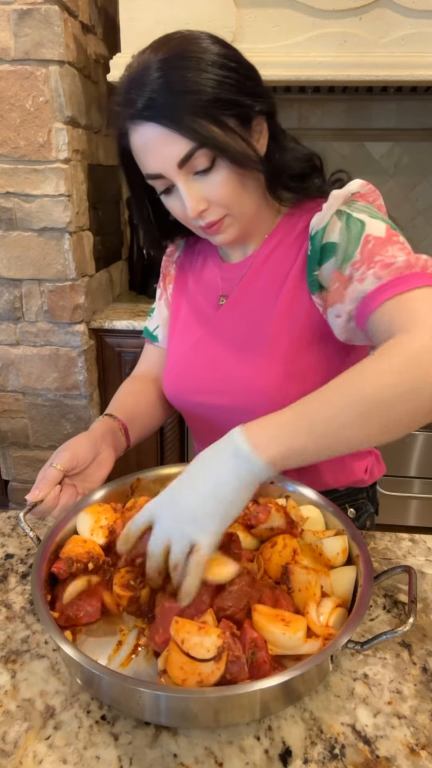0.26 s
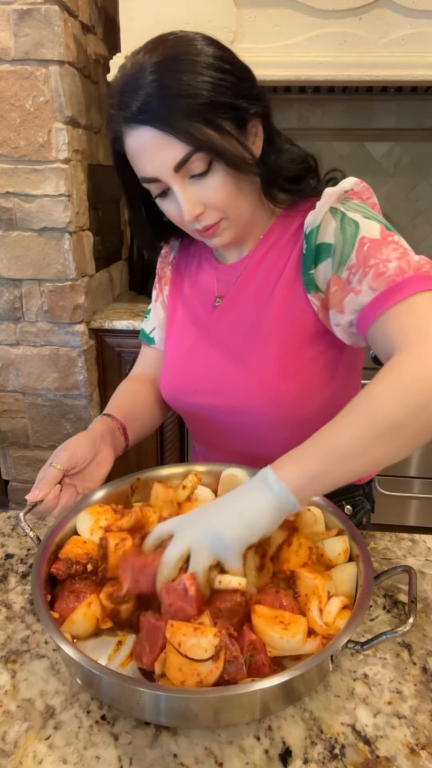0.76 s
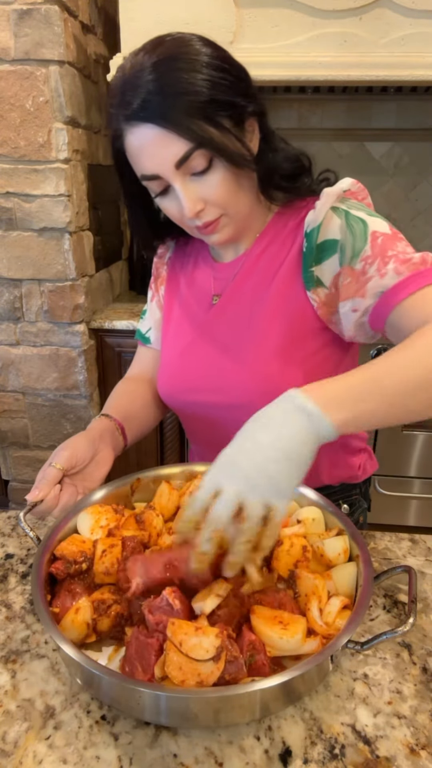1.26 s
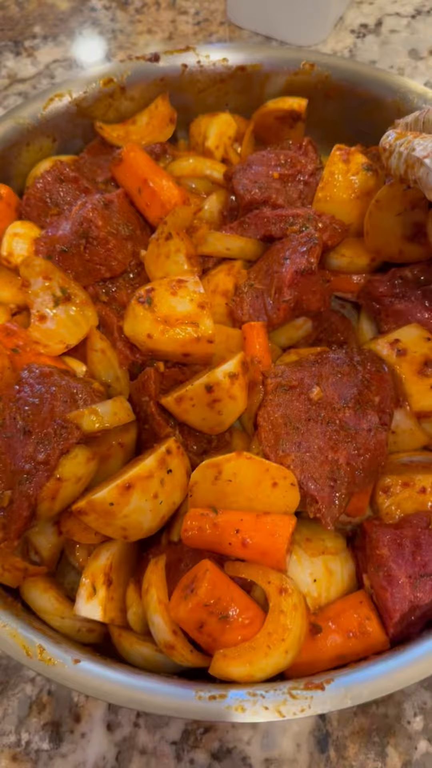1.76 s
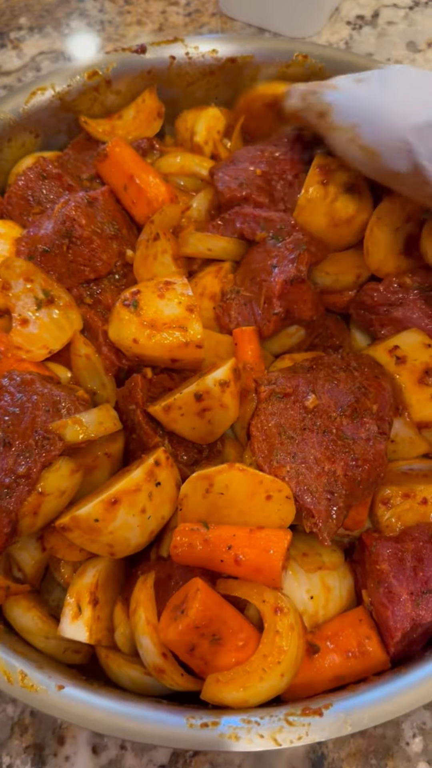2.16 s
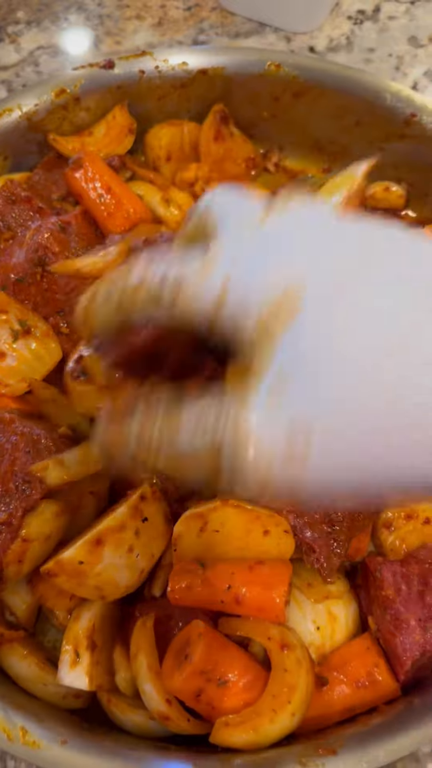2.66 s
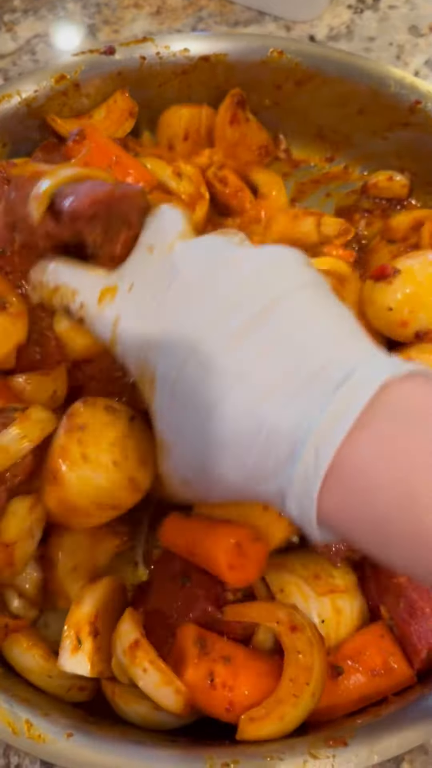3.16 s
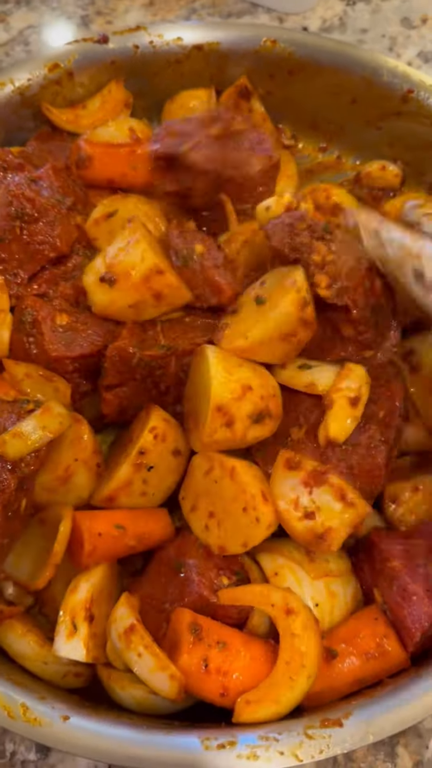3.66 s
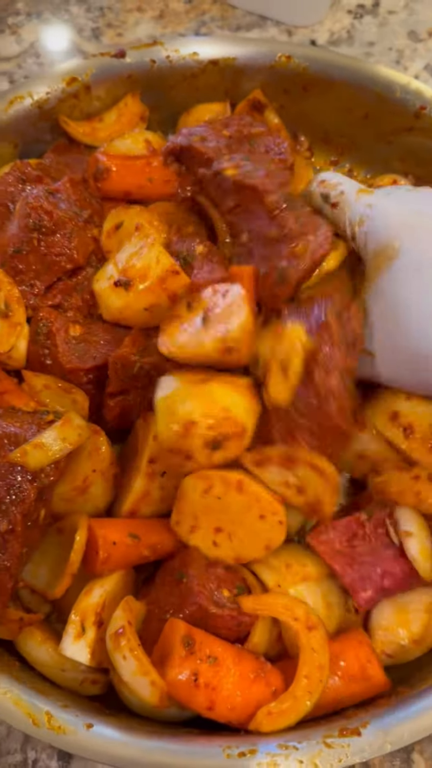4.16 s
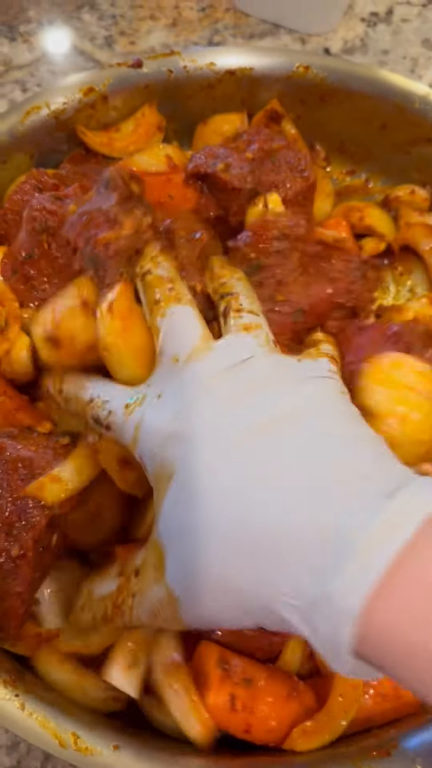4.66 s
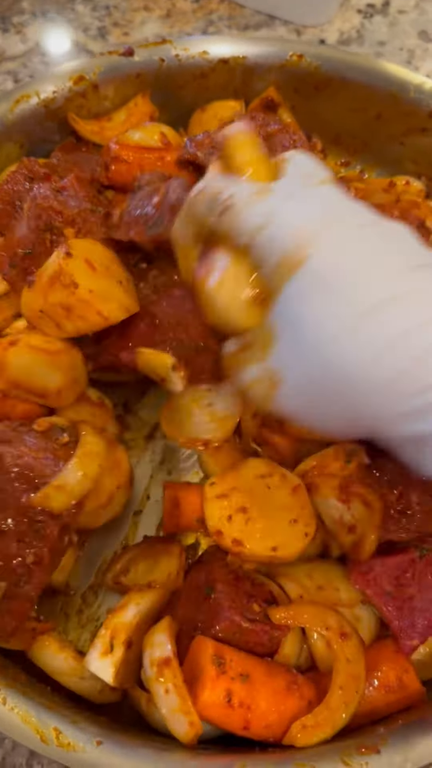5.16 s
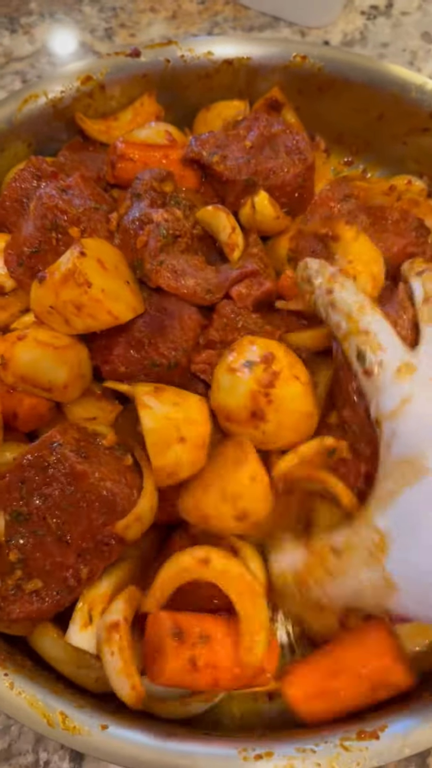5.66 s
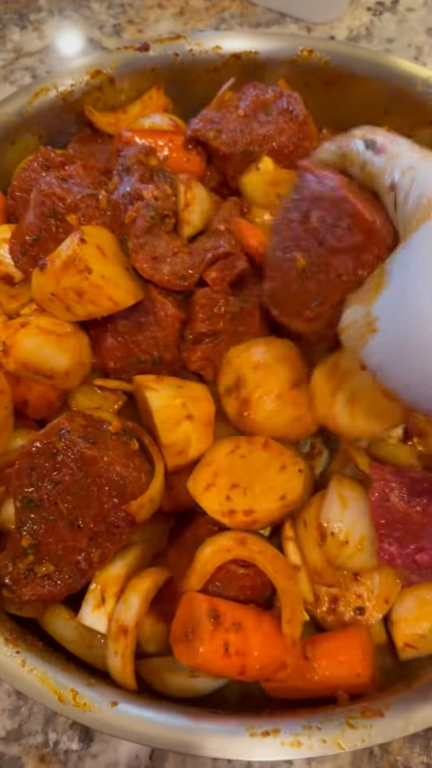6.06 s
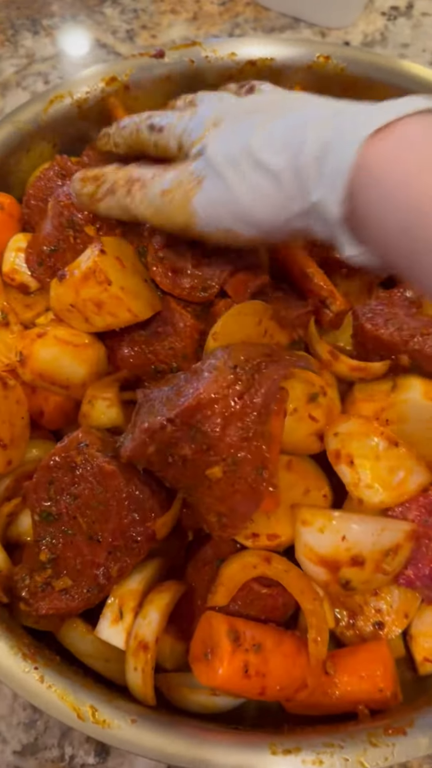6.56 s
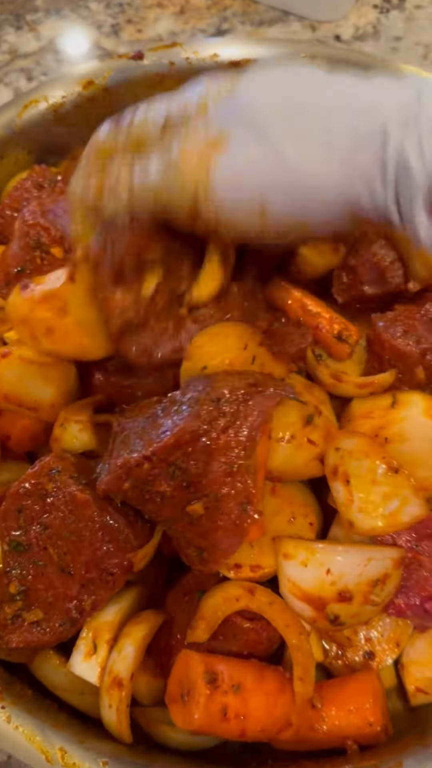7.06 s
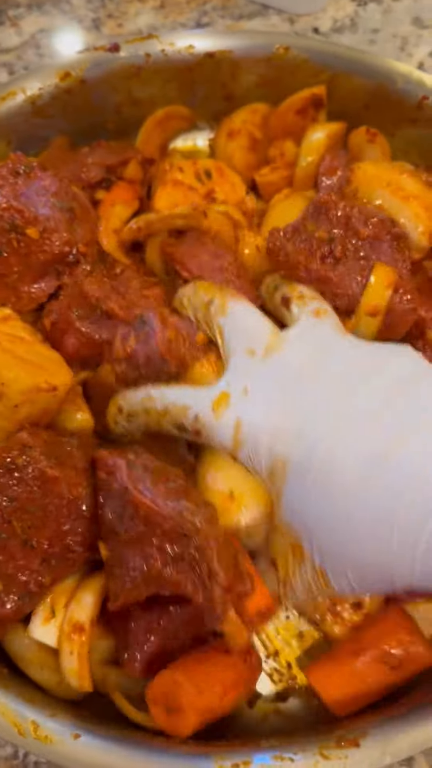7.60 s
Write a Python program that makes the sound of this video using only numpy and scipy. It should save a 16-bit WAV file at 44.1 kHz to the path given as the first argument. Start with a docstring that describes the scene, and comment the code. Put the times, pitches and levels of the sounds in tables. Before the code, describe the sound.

A quiet kitchen with low, soft room air and a faint wavering appliance hum. From 0 to 1.8 s, the microphone is across the counter, in mono and a little roomy: soft squelches around 0.6 to 0.9 s, small pops, dull plops of food, and a wet click at 1.5 s. Then the sound dips briefly and becomes close stereo above the steel pot, brighter and more detailed. Squishes and sticky crackles come at 2.1 and 3.0 to 3.3 s, with plops near 2.7. At 4.0 s comes the strongest wet pop and hollow plop. Dense sticky tearing follows from 4.6 to 5.1 s, then another squelch at 5.5 to 5.9. After a lull, several chunks plop together around 6.7 s with muted pot resonance. From 7.3 s to the end, plops and quick juicy squelches with crisp film ticks continue.

```python
"""A gloved hand turns raw meat and vegetable chunks in oily sauce in a steel pot, in a quiet kitchen.
Clumps of tiny ringing grains and noise make the squelching sauce and the tearing of sticky films.
Air pockets pop as brief rising rings; chunks plop as sinking notes with a slap and the pot's resonances.
The microphone is first across the counter, in mono, then right above the pot, in stereo.
Still room air is coloured noise, and an appliance hums in wavering tones."""
import sys
import numpy as np
from scipy import signal
from scipy.fft import rfft, irfft, next_fast_len
from scipy.io import wavfile
from scipy.ndimage import uniform_filter1d, map_coordinates

SR = 44100
rng = np.random.default_rng(int(sys.argv[2]) if len(sys.argv) > 2 else 0)


def dump(signal):
    """Clip the signal to [-1, 1] and save it as 16-bit WAV at the path in sys.argv[1]."""
    limited = np.clip(np.atleast_2d(signal).T, -1, 1)
    pcm = np.round(limited * 32767).astype(np.int16)
    wavfile.write(sys.argv[1], SR, pcm)


N = 345302

CLOSE_S = 1.787  # from here on the microphone is right above the pot
# chunks landing on the heap and the pot floor: start_s, level_db (nominal), pitch_hz (before its glide),
# floor_db (pot against level, halved in use), slap_db (against level, capped at 6)
PLOPS = [(0.315, -43, 503, -22, 1.5), (0.55, -40.5, 213, -15, -10), (0.625, -34, 195, -23, -6),
         (0.74, -38.5, 119, -11, -7), (1.045, -44.5, 124, -9, -12), (1.504, -40, 556, -11, 6),
         (1.599, -41.5, 148, 0, 1.5), (2.184, -41.5, 262, -2, -20), (2.725, -39.5, 598, -18, -1.5),
         (2.733, -33.5, 275, -29, -24), (2.76, -39.5, 263, -21, -27), (2.96, -40, 396, -2, 1),
         (3.28, -40.5, 260, -19, -12), (3.562, -43, 270, -12, -28), (3.987, -25.5, 406, -18, -9),
         (4.003, -36.5, 149, -10, -12), (4.773, -43.5, 128, -16, -15), (5.637, -35.5, 547, -7, -3),
         (5.659, -37.5, 135, -6, -19), (5.736, -41, 167, -8, 0), (6.593, -44, 510, -6, -15),
         (6.675, -38.5, 439, -2, -8), (6.694, -27, 516, -7, -5), (6.709, -26.5, 450, -16, -10),
         (6.72, -32, 260, -22, -32), (6.737, -34.5, 135, -1, -33), (6.804, -38, 116, 2, -26),
         (7.336, -34.5, 547, -33, -16), (7.346, -32, 440, -24, -20), (7.455, -36.5, 120, -4, -8)]


def amp(db):
    """Decibels to gain."""
    return 10 ** (np.asarray(db) / 20)


def unit(x):
    """Scaled to rms 1."""
    return x / np.sqrt(np.mean(x ** 2) + 1e-20)


def along(points, hz):
    """Points of (frequency, value) read on a log frequency axis."""
    f, v = np.transpose(points)
    return np.interp(np.log(hz + 1), np.log(f + 1), v)


def wobble(rate):
    """A smooth random curve, rate knots a second."""
    coarse = np.arange(0, N + 32, 32)
    knots = rng.standard_normal(int(N * rate / SR) + 4)
    return np.interp(np.arange(N), coarse, map_coordinates(knots, [coarse * rate / SR]))


def filtered(x, response):
    """x times a complex response of frequency."""
    m = next_fast_len(N + SR // 2)
    spectrum = rfft(x, m) * response(np.fft.rfftfreq(m, 1 / SR))
    return irfft(spectrum, m)[..., :N]


def coloured(x, spectrum):
    """x given a spectrum in dB, at rms 1."""
    return unit(filtered(x, lambda hz: amp(along(spectrum, hz))))


def add(track, s, sound):
    """Mix a sound into a track at time s."""
    start = max(0, round(s * SR))
    part = sound[:max(0, N - start)]
    track[start:start + len(part)] += part


def steady(x, span):
    """x with its level evened out over span seconds."""
    power = np.abs(uniform_filter1d(x ** 2, int(span * SR)))
    return x / np.sqrt(power + 1e-4)


def grains(rate, low_hz, high_hz, cycles, spread_db, size):
    """Tiny cavities, rate a second, each ringing for a few cycles at its own pitch and strength."""
    when, pitch, strength, life = rng.random((int(rate * N / SR), 4)).T[:, :, None]
    turns = low_hz * (high_hz / low_hz) ** pitch * np.arange(size) / SR
    # most grains are faint, a few stand out
    gain = amp(spread_db * np.minimum(-np.log(1 - strength), 4))
    rings = gain * np.sin(2 * np.pi * turns) * np.exp(-turns / (cycles * (.5 + life)))
    at = (when * N).astype(int) + np.arange(size)
    out = np.bincount(at.ravel(), rings.ravel(), N + size)[:N]
    # small cavities are brief and hold little energy: lifting them evens the spectrum
    return unit(filtered(out, lambda hz: np.clip(hz, low_hz, high_hz)))


def shifting(x, depth_db):
    """Gaps between the pieces open and close, so resonances come and go."""
    z = signal.stft(x, nperseg=512)[2]
    field = rng.standard_normal(z.shape)
    field = uniform_filter1d(field, size=5, axis=0)  # smooth over frequency
    field = uniform_filter1d(field, size=7, axis=1)  # smooth over time
    return signal.istft(z * amp(depth_db * unit(field)), nperseg=512)[1][:N]


def burst(t, rise, decay, low_hz, high_hz):
    """A band of noise that swells quickly and dies away, peak 1; rise and decay in seconds."""
    band = signal.butter(2, [low_hz, min(high_hz, .45 * SR)], "band", fs=SR, output="sos")
    envelope = (1 - np.exp(-t / rise)) * np.exp(-t / decay)
    x = signal.sosfilt(band, rng.choice([-1, 1], len(t)) * envelope)
    return x / np.abs(x).max()


def swells(events, rise, decay, rest_db):
    """Level in dB of (start, hold, dB) events that build up, hold and die away over a resting level."""
    t = np.arange(0, N + 64, 64) / SR
    start, hold, db = np.transpose(events)[:, :, None]
    before = np.maximum(start - t, 0)
    after = np.maximum(t - start - hold, 0)
    shape = np.exp(-before / rise - after / decay)
    power = np.sum((amp(db) * shape) ** 2, axis=0) + amp(rest_db) ** 2
    return np.interp(np.arange(N) / SR, t, 10 * np.log10(power))


def hand():
    """Nominal squelch and film crackle levels in dB as the hand pushes and lets go."""
    # pushes of the hand through the food: start_s, hold_s, squelch_db, film_db
    strokes = [(0.0, .14, -58.5, -61.5), (0.18, 0.2, -64.5, -65.5), (0.556, 0.08, -53, -62.5),
               (0.712, 0.042, -50, -55.5), (0.787, 0.17, -53, -59), (0.987, 0.37, -63, -67),
               (1.512, 0.12, -55.5, -61.5), (1.674, 0.093, -58, -64), (2.063, 0.014, -46.5, -60),
               (2.128, 0.051, -54.5, -55.5), (2.234, 0.25, -61.5, -67.5), (2.8, 0.2, -65, -67.5),
               (2.996, 0.054, -51.5, -55.5), (3.11, 0.21, -56, -59.5), (3.337, .12, -68.5, -61.5),
               (3.743, 0.22, -62.5, -62.5), (3.972, 0.13, -51, -55.5), (4.164, 0.082, -63, -65),
               (4.612, .01, -60.5, -60.5), (4.685, 0.041, -58, -52), (4.842, 0.09, -53, -50),
               (4.971, 0.023, -49, -46), (5.121, 0.13, -68, -66.5), (5.513, 0.021, -53.5, -54),
               (5.615, 0.25, -53, -55), (5.964, 0.068, -66.5, -60), (6.199, 0.025, -67, -64),
               (6.577, 0.1, -64, -59), (6.76, 0.012, -54.5, -65), (6.847, 0.16, -59.5, -64),
               (7.08, 0.018, -64, -69.5), (7.373, 0.074, -52.5, -55.5), (7.526, 0.066, -56, -59),
               (7.651, 0.044, -48.5, -50), (7.766, 0.041, -51, -55.5)]
    press_s, let_go_s = 0.029, 0.03  # time constants of a push building up and dying away
    # the resting levels are the sauce creeping between pushes
    squelch = [(s, hold, db) for s, hold, db, _ in strokes]
    film = [(s, hold, db) for s, hold, _, db in strokes]
    squelch_db = swells(squelch, press_s, let_go_s, rest_db=-80)
    film_db = swells(film, press_s, let_go_s, rest_db=-71.5)
    return squelch_db, film_db


def sauce(close):
    """Sauce squelches between the pieces while sticky films tear off glove and meat."""
    # spectrum of the squelch: frequency_hz, level_db (relative)
    squelch_colour = [(400, -23), (700, -2), (1100, -.5), (1500, -2), (2100, -2), (3000, -8.5), (5000, -11),
                      (9000, -15)]
    # spectrum of the films from across the counter: frequency_hz, level_db (relative)
    film_far = [(1500, -2), (3300, -1), (5000, -4), (7000, 0), (10000, 3.5), (12500, -6), (16000, -6)]
    # spectrum of the films from right above the pot: frequency_hz, level_db (relative)
    film_near = [(1500, -5.5), (3300, -3), (5000, -1), (7000, 0.5), (9300, 2.5), (15500, -5)]

    squelch_db, film_db = hand()
    clumps = wobble(70)  # pieces stick and let go
    # a light touch gives single ticks; in a hard stroke they merge into a wet rustle
    merged = np.interp(np.maximum(squelch_db, film_db), [-62, -46], [.5, 1.5])
    bubbles = grains(rate=1000, low_hz=598, high_hz=4480, cycles=1.7, spread_db=3.5, size=300)
    ticks = grains(rate=900, low_hz=2650, high_hz=15300, cycles=1.55, spread_db=4.5, size=100)

    squelching = shifting(bubbles + merged * rng.standard_normal(N), depth_db=4.5) * amp(2.1 * clumps)
    squelch = coloured(squelching, squelch_colour)
    tearing = shifting(ticks + merged * rng.standard_normal(N), depth_db=2.5) * amp(2.66 * clumps)
    film = np.where(close, coloured(tearing, film_near), coloured(tearing, film_far))
    return amp(squelch_db - 1.77) * steady(squelch, span=.06) + amp(film_db + 2.0) * steady(film, span=0.074)


def heap():
    """Soft pieces tumble against each other with dull bumps, under the hand and after each landing."""
    # spectrum of the bumps: frequency_hz, level_db (relative)
    bump_colour = [(50, -9), (90, 2), (160, 2.5), (280, -4.5), (500, -7), (900, -17), (2000, -47)]
    bumps = grains(rate=130, low_hz=99.5, high_hz=804, cycles=1.11, spread_db=2, size=2400)
    # neighbours tumble 18.5 dB below a landing's level; the resting level is the heap's slow shifting
    landings = [(s, 0, db - 18.5) for s, db, *_ in PLOPS]
    tumble_db = swells(landings, rise=0.015, decay=0.068, rest_db=-64)
    push_db = hand()[0] - 11.5  # the heap's share of a push
    level = np.hypot(amp(tumble_db), amp(push_db))
    return level * steady(coloured(bumps, bump_colour), span=0.16)


def background():
    """Still room air as coloured noise and an appliance's wavering hum, as mid and side."""
    # spectrum of the room air: frequency_hz, level_db (relative)
    air_colour = [(25, -16), (45, 3.5), (100, 0), (200, -5), (500, -17.5), (900, -27.5), (1500, -29.5),
                  (2600, -30), (4500, -37), (6500, -31.5), (9000, -34.5), (11000, -49), (15500, -34)]
    # appliance tones: frequency_hz, level_db (nominal, wavers)
    hum_tones = [(43.3, -61.5), (59.5, -73.5), (115, -64)]
    t = np.arange(N) / SR
    hum = np.zeros(N)
    for hz, db in hum_tones:
        level = amp(db + 2.8 * wobble(4.1))
        hum += level * np.sin(2 * np.pi * hz * t + 0.86 * wobble(5.0))
    mid, side = amp(-57) * coloured(rng.standard_normal((2, N)), air_colour)
    return hum + mid, side


def plops():
    """A chunk slaps down with a hollow note that sinks as it settles; the loaded pot answers."""
    # resonances of the loaded pot: frequency_hz and level_db (both vary by landing), t60_s
    pot_modes = [(83, -3, 0.095), (114.4, 4.5, 0.37), (164, -2.5, .14), (252, -1.5, 0.28),
                 (336, -4.5, 0.22), (428.4, -2.5, 0.12), (525, -17, 0.12)]
    out, t = np.zeros(N), np.arange(SR // 5) / SR
    cushion = 1 - np.exp(-t / 0.0012)  # the heap softens the blow on the steel
    for s, db, hz, floor_db, slap_db in PLOPS:
        turns = np.cumsum(hz * (0.919 + 0.32 * np.exp(-t / 0.0028))) / SR
        note = np.sin(2 * np.pi * turns) * np.exp(-t / 0.0072) * (1 - np.exp(-t / 0.0012))
        slap = burst(t, rise=0.00028, decay=0.0039, low_hz=755, high_hz=1940)
        pot = np.zeros(len(t))
        for mode_hz, mode_db, t60 in pot_modes:
            louder, sharper = rng.standard_normal(2)
            ringing = np.sin(2 * np.pi * mode_hz * (1 + 0.024 * sharper) * t)
            pot += amp(mode_db + 1.6 * louder - 60 * t / t60) * ringing
        landing = amp(db + .5) * note
        landing += amp(db + min(slap_db, 6) - 1.0) * slap
        landing += amp(db + .5 * floor_db - 10.5) * pot * cushion
        add(out, s, landing)
    return out


def pops():
    """A film snaps and the air pocket behind it rings for a few cycles, rising as it opens."""
    # larger air pockets opening in the sauce: start_s, level_db (nominal), pitch_hz (before its glide),
    # snap_db (against level, capped at 0 and scaled by 0.55 in use)
    pockets = [(0.616, -35.5, 900, -12), (0.718, -29.5, 1980, -13), (0.828, -32, 2240, -17),
               (0.861, -32, 2320, -1), (0.905, -31, 6660, -3), (0.922, -28, 2260, -26),
               (1.112, -34, 8700, -14), (1.308, -45, 1260, -13), (1.504, -27.5, 1400, -7),
               (2.07, -35, 1410, -27), (2.343, -31, 4050, -10), (2.347, -33.5, 1880, -3),
               (2.393, -30.5, 6300, -13), (2.45, -37, 1160, -30), (2.482, -36.5, 6600, -12),
               (2.544, -34.5, 7100, -16), (2.726, -38.5, 1600, -6), (2.785, -36, 6300, -33),
               (2.901, -38, 5330, -14), (2.943, -25, 1400, -39), (2.961, -36, 1800, -2),
               (3.096, -24.5, 1236, -7), (3.221, -28, 1510, -34), (3.329, -28, 8400, -5),
               (3.679, -46, 1660, 1), (3.775, -32, 6340, -13), (3.822, -31, 6800, -14),
               (3.962, -31.5, 1800, 2), (3.983, -17.5, 1550, -20.5), (4.148, -34, 5900, -28),
               (4.306, -39, 4430, -4), (4.482, -37, 5920, -15), (4.659, -37.5, 5830, -7.5),
               (4.672, -32, 2470, -11), (4.846, -34, 1430, 0), (4.901, -31, 1030, -13),
               (4.985, -38, 1400, -12), (5.019, -31.5, 6800, -13), (5.036, -32.5, 3600, -5),
               (5.148, -34, 7900, -40), (5.586, -33, 2400, -11), (5.638, -32, 1960, -22),
               (5.698, -29, 8260, -29), (5.944, -33.5, 5640, -23), (6.314, -38.5, 2210, -10),
               (6.387, -40, 6050, -19), (6.694, -24, 822, -17.5), (6.871, -36.5, 2800, -25),
               (7.176, -40, 5800, -27), (7.306, -34.5, 5330, -9), (7.371, -31.5, 2000, -28),
               (7.463, -32, 960, 1), (7.652, -25.5, 1820, -19)]
    out, t = np.zeros(N), np.arange(SR // 30) / SR
    for s, db, hz, snap_db in pockets:
        turns = np.cumsum(hz * (1.1 - 0.38 * np.exp(-hz * t / 2))) / SR
        age = t / (0.00016 + 0.54 / hz)  # big pockets open and close more slowly
        pocket = np.sin(2 * np.pi * turns) * age ** 2 * np.exp(-age)
        # sauce splatters over the pocket and roughens its ring
        splatter = burst(t, rise=0.0016, decay=0.0022, low_hz=0.7 * hz, high_hz=1.7 * hz)
        ring = pocket / np.abs(pocket).max() + 0.58 * splatter
        ring /= np.abs(ring).max()
        snap = burst(t, rise=.002, decay=.0012, low_hz=2400, high_hz=12500)
        add(out, s, amp(db - 4.5) * ring + amp(db + .55 * min(snap_db, 0) - 1.0) * snap)
    return out


def kitchen(x):
    """The room's diffuse answer, as two unrelated tails of noise that decay by frequency."""
    # reverberation of the kitchen: frequency_hz, t60_s
    room_decay = [(100, 0.54), (1000, 0.33), (5000, 0.37), (15000, 0.13)]
    hz, t, z = signal.stft(rng.standard_normal((2, SR // 2)), SR, nperseg=256)
    fading = amp(-60 * t / along(room_decay, hz)[:, None])
    tail = signal.istft(z * fading, SR, nperseg=256)[1]
    tail /= np.linalg.norm(tail[0])
    late = np.pad(x, (150, 0))[None]  # the answer starts 150 samples after the direct sound
    return signal.fftconvolve(late, tail, axes=1)[:, :N]


def ports(mid, side):
    """Two microphone ports close to the pot: alike in the bass, with their own level and phase higher up."""
    # level of the left port over the right: frequency_hz, difference_db
    lean = [(150, 0), (300, -1), (500, -1), (1000, -2.5), (2000, 0), (4000, -0.1)]
    # phase by which the right port leads: frequency_hz, lead_rad
    lead = [(250, 0), (520, .5), (720, 1.8), (930, 1), (1250, 0.72), (2000, 0), (4800, 1.1), (6500, 1),
            (9500, 2), (11000, 4), (13500, 5), (15700, 3.5)]
    # the close microphone's treble colour: frequency_hz, gain_db
    treble = [(9400, -1), (10700, -6.5), (12500, -21.5), (14800, 3.5)]
    # stereo width of the side signal: frequency_hz, gain_db
    width = [(60, -24), (140, -18.5), (260, -8), (700, -4), (1400, -24.5), (3000, -3), (10000, -9.5)]
    side = filtered(side, lambda hz: amp(along(width, hz)))

    def response(hz):
        """Half of the difference goes to the left port, its inverse to the right."""
        half = amp(along(lean, hz) / 2) * np.exp(-.5j * along(lead, hz))
        return amp(along(treble, hz)) * half ** np.array([[1], [-1]])

    return filtered(np.array([mid + side, mid - side]), response)


def scene():
    """The pot, heard in mono from across the counter and then in stereo from just above."""
    close = np.arange(N) / SR > CLOSE_S
    wet = sauce(close) + pops()
    food = wet + heap() + plops()
    air, air_side = background()
    room, room_side = kitchen(food)
    far = amp(0.64) * food + amp(-5) * room + amp(3) * air
    scatter = 0.63 * np.tanh(wobble(130)) * wet  # each click comes from its own spot in the pot
    near_mid = food + amp(-14) * room + air
    near_side = scatter + amp(-16) * room_side + air_side
    return np.where(close, ports(near_mid, near_side), far)


def record(dry):
    """The recorder limits the band at both ends; above the bass, the level dips briefly, then stands higher."""
    # level above the bass, held before the first and after the last point: time_s, gain_db
    dip = [(1.785, -2.5), (1.789, -9.5), (1.9, -10), (1.92, 6)]
    top_hz, bottom_hz = 16200, 35.0
    s, gain_db = np.transpose(dip)
    gain = amp(np.interp(np.arange(N) / SR, s, gain_db))
    bass = filtered(dry, lambda hz: 1 / (1 + (hz / 500) ** 2))
    sound = bass + (dry - bass) * gain
    return filtered(sound, lambda hz: (hz < top_hz) * hz ** 10 / (hz ** 10 + bottom_hz ** 10))


dry = scene()
out = record(dry)
dump(out)
```